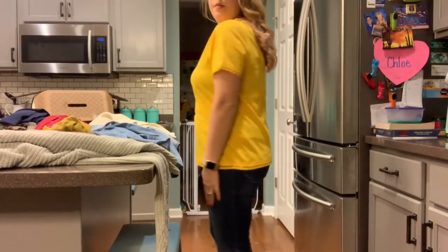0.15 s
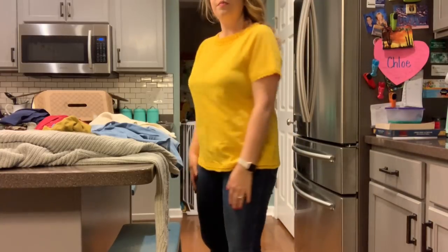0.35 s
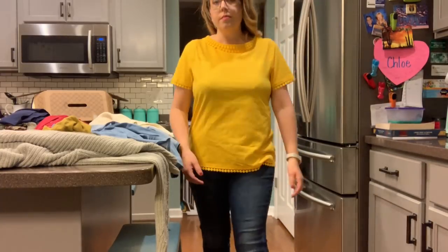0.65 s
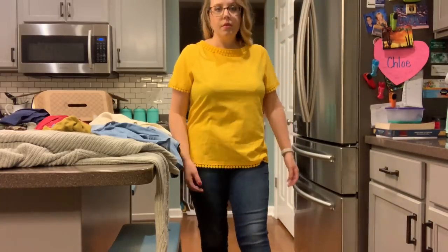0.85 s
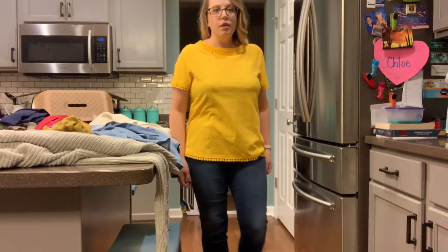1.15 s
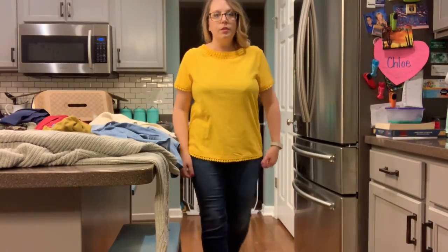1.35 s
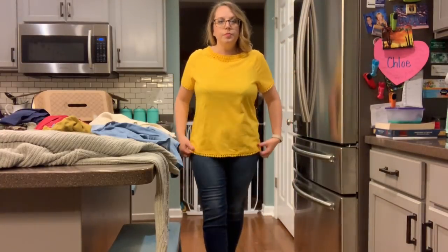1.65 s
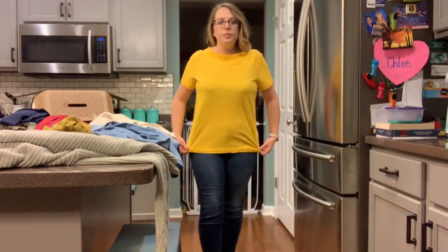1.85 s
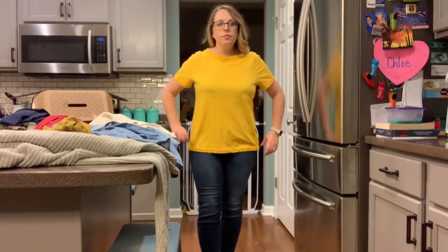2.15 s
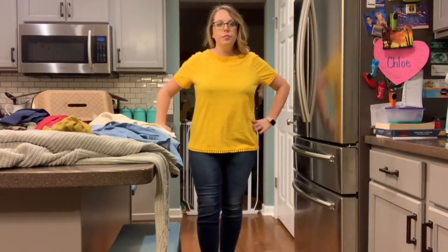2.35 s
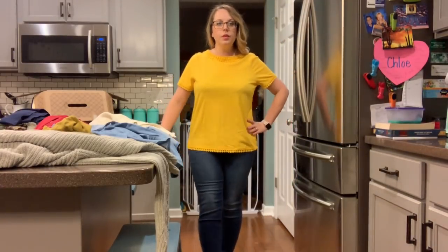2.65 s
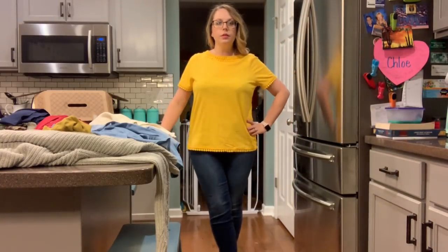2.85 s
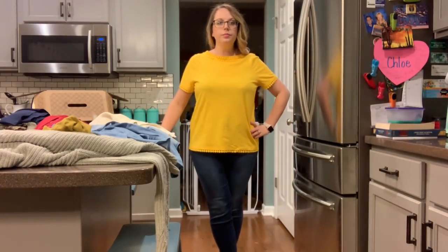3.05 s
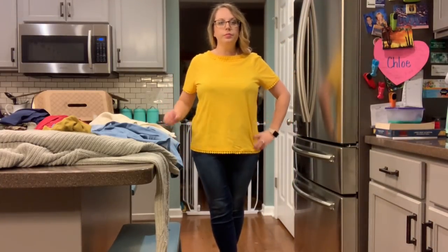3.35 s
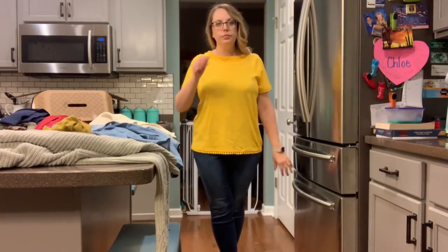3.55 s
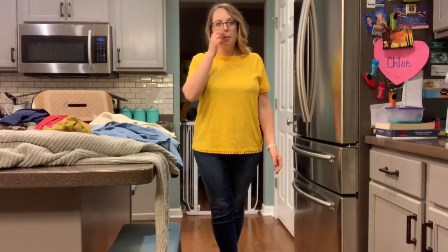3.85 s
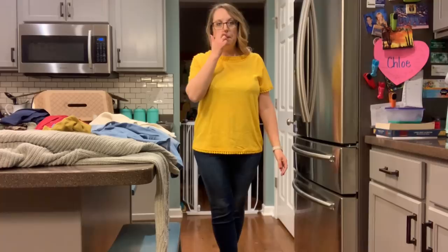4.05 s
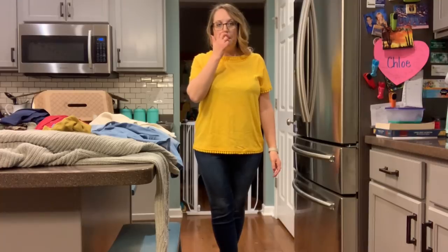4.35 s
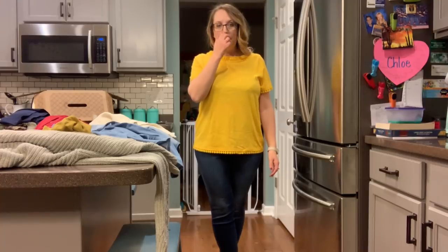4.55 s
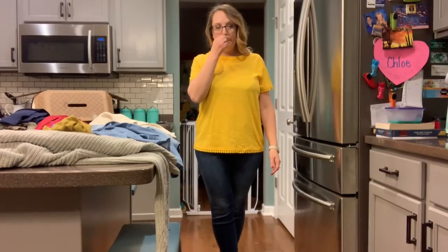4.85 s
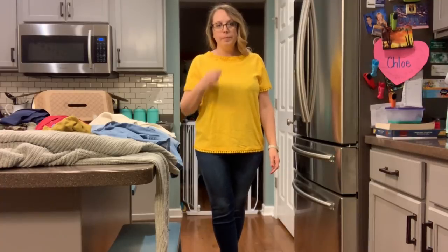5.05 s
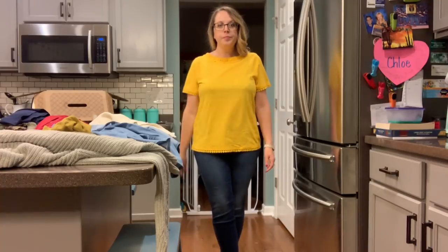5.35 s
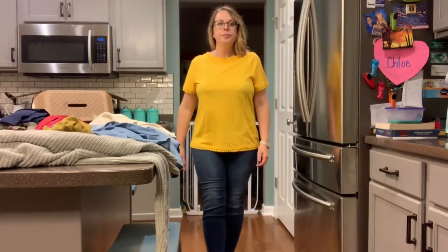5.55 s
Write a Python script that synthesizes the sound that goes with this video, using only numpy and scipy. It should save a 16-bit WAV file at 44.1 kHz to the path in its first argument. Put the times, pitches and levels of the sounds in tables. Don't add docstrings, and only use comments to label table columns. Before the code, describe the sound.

A quiet home kitchen is heard in stereo from a phone a few metres away, with faint refrigerator hum, low floor drone, thin appliance whine and slight hiss throughout. A soft step and faint crack come at 0.15-0.2 s, with light cloth rustle. Around 0.75-0.9 s another padded step knocks the boards, and a short rough creak squeaks at 0.94-1.05 s. A heavier cluster of thuds and knocks lands at 1.4-1.6 s, then the strongest low, woody crack at about 1.9 s. Small settling sounds follow, with duller thumps near 2.7 and 2.9 s and a fabric swish. A soft sleeve swish passes at 3.4 s, then the floor is almost still. A faint crack sounds at 4.2 s, tiny settling and a sleeve flick near 4.9 s, and faint knocks at 5.3 s. Clothing rustles more clearly at 5.4-5.7 s with a last gentle thump. Hard walls answer each blow briefly.

```python
import sys
import numpy as np
from scipy import signal
from scipy.fft import rfft, irfft, next_fast_len
from scipy.io import wavfile
from scipy.ndimage import uniform_filter1d, map_coordinates

SR = 44100
rng = np.random.default_rng(int(sys.argv[2]) if len(sys.argv) > 2 else 0)


def digitize_waveform(pressure):
    field = np.atleast_2d(pressure).T
    bounded = np.clip(field, -1, 1)
    quanta = np.round(bounded * 32767).astype(np.int16)
    wavfile.write(sys.argv[1], SR, quanta)


def undo_db(level):
    steps = np.asarray(level, float) / 20
    return 10 ** steps


N = 250750


def unit(x):
    return x / np.sqrt(np.mean(x ** 2) + 1e-20)


def along(points, hz):
    f, v = np.transpose(points)
    return np.interp(np.log(hz + 1), np.log(f + 1), v)


def curves(rows):
    s, *cols = np.transpose(rows)
    return [np.interp(np.arange(N) / SR, s, c) for c in cols]


def wobble(rate):
    knots = rng.standard_normal(int(N * rate / SR) + 4)
    return map_coordinates(knots, [np.arange(N) * rate / SR])


def filtered(x, response):
    n = x.shape[-1]
    m = next_fast_len(n + 8192)
    return irfft(rfft(x, m) * response(np.fft.rfftfreq(m, 1 / SR)), m)[..., :n]


def hump(hz, pitch_hz, rise_db, fall_db):
    octaves = np.log2((hz + 1) / pitch_hz)
    return undo_db(np.where(octaves < 0, rise_db, -fall_db) * octaves)


def spread(pair, spectrum):
    # f/Hz, left-right likeness
    alike = [(60, 0.97), (130, 1), (290, 0.93), (640, 0.71), (1410, 0.33), (3100, 0.17), (6800, 0.065),
             (15000, 0.13)]

    def mid_side(hz):
        turn = np.arccos(np.clip(along(alike, hz), -1, 1)) / 2
        return undo_db(along(spectrum, hz)) * [np.cos(turn), np.sin(turn)]

    mid, side = filtered(pair, mid_side)
    return np.array([mid + side, mid - side])


def rush(spectrum, patchy_db):
    z = signal.stft(rng.standard_normal((2, N)), nperseg=512)[2]
    field = uniform_filter1d(rng.standard_normal(z.shape[1:]), size=6, axis=0)
    field = uniform_filter1d(field, size=8, axis=1)
    pair = signal.istft(z * undo_db(patchy_db * unit(field)), nperseg=512)[1][:, :N]
    return unit(spread(pair, spectrum))


def strokes(rows):
    t = np.arange(N) / SR
    gains = []
    for s, db, swell, fade, *_ in rows:
        away = abs(t - s) / np.where(t < s, swell, fade)
        loss_db = 25 * away ** 1.37
        gains.append(undo_db(np.maximum(db - loss_db, -160)))
    return np.array(gains)


def joined(gains):
    return np.sqrt(np.sum(gains ** 2, axis=0))


def hiss():
    # f/Hz, density/dB per Hz
    noise_colour = [(300, -16), (700, -12.5), (1500, 1), (3000, -1), (8000, -4.5), (15700, -2)]
    return undo_db(-80.5) * rush(noise_colour, patchy_db=-2.7)


def whine():
    level = undo_db(-93 + 2.5 * wobble(23))
    tone = level * np.sin(2 * np.pi * 4360 * np.arange(N) / SR + 1.1 * wobble(60))
    return tone * np.array([[1.4], [-.6]])


def refrigerator():
    # f/Hz, level/dB rms
    tones = [(88, -73.5), (153, -70.5), (268, -80.5)]
    t = np.arange(N) / SR
    hum = np.zeros(N)
    for hz, db in tones:
        level = undo_db(db + 3.0 + 3.9 * wobble(6.9))
        hum += level * np.sin(2 * np.pi * hz * t + 1.88 * wobble(7.0))
    return hum


def joists():
    # peak t/s, drone level/dB, swell/s, fade/s, sway over drone/dB
    presses = [(0, -58, .1, 0.82, -3.5), (.7, -59.5, 1, 0.93, -4), (1.01, -59, 0.45, 0.14, 5),
               (1.17, -70, 0.16, 0.22, 14.5), (1.57, -46, 0.17, 0.16, 0.5), (1.9, -66, 0.67, 0.63, 10.5),
               (2.5, -60.5, 0.54, 0.79, 4.5), (2.96, -56, 0.08, 0.26, 5), (3.5, -66, 0.13, 0.35, -6.5),
               (3.7, -77, 0.4, 0.21, 8), (5.3, -69, 1, 0.95, -13.5), (5.6, -63.5, 0.56, 0.26, -3.5)]
    # f/Hz, density/dB per Hz
    sway_colour = [(10, -39.5), (20, 4.5), (35, -3), (60, -4.5), (90, -23.5), (200, -52.5)]
    # f/Hz, density/dB per Hz
    drone_colour = [(35, -35), (60, -20), (76, -4), (97, -3.5), (114, -11.5), (161, -2), (183, -10.5),
                    (268, -11.5), (348, -20.5), (683, -27), (773, -29), (1600, -39.5), (2080, -80),
                    (3520, -120)]
    rest_sway_db, rest_drone_db = -70.5, -67.5
    load = strokes(presses)
    sway_load = joined(load * undo_db(np.array(presses)[:, -1:]))
    sway = np.hypot(undo_db(rest_sway_db), sway_load) * rush(sway_colour, patchy_db=1)
    drone = np.hypot(undo_db(rest_drone_db), joined(load)) * undo_db(2.96) * rush(drone_colour, patchy_db=2.5)
    return sway + drone


def cloth():
    # peak t/s, rustle level/dB, swell/s, fade/s, heavy folds over rustle/dB
    fabric = [(0, -68.5, 0.043, 0.046, 5), (.11, -71.5, 0.12, 0.061, -25), (.28, -71.5, 0.35, 0.46, -8),
              (.57, -63.5, 0.21, 0.25, -15), (1.02, -72.5, 0.29, 0.12, 3), (1.29, -67, .04, 0.11, 2.5),
              (1.46, -63, 0.23, 0.2, 4), (1.549, -66.5, 0.29, 0.23, 2.5), (1.95, -73, 0.13, 0.18, 10.5),
              (2.37, -80.5, 0.029, 0.41, 6), (2.528, -64.5, 0.085, 0.21, 9), (2.75, -86.5, .2, 0.25, -11),
              (2.958, -61, 0.06, 0.12, 13.5), (3.14, -76.5, 0.22, 0.079, 3.5),
              (3.33, -79, 0.053, 0.17, -12), (3.441, -67, .2, 0.15, -4), (3.72, -82, 0.11, 0.14, -5.5),
              (4.88, -85, 0.12, 0.042, 11), (5.15, -90.5, 0.32, .2, 9.5), (5.359, -81, 0.1, 0.087, 10),
              (5.42, -60, 0.091, 0.083, 3.5), (5.648, -54.5, 0.1, 0.3, 3)]
    # peak t/s, level/dB, swell/s, fade/s
    sleeve = [
        (3.42, -63, 0.18, 0.13),
        (4.91, -67.5, 0.051, 0.033),
        (5.42, -79, .06, .07),
        (5.68, -62, .14, .1),
    ]
    # f/Hz, density/dB per Hz
    weave = [(300, -25), (1200, -11.5), (2200, -6.5), (3500, -2), (5000, -3.5), (7500, -7.5), (9500, -8),
             (12500, -10), (15700, -10)]
    fold = [(120, -73), (300, 1.5), (600, -9.5), (1200, -7), (2500, -9), (5000, -25.5)]
    sheen = [(3000, -33), (8000, -16), (11000, 0), (15000, 11), (15700, -2)]
    rubs = strokes(fabric)
    heavy = joined(rubs * undo_db(np.array(fabric)[:, -1:]))
    catches = undo_db(.8 * wobble(40) + 1.2 * wobble(300))
    fine = joined(rubs) * rush(weave, patchy_db=.7)
    folds = heavy * undo_db(-6.0) * rush(fold, patchy_db=1.0)
    swish = joined(strokes(sleeve)) * rush(sheen, patchy_db=5.5)
    return catches * (undo_db(5.5) * (fine + folds) + swish)


def ticks():
    # t/s, peak level/dB, f/Hz, t60/s
    taps = [
        (0.197, -60, 5460, 0.049),
        (.867, -54.5, 7600, 0.052),
        (1.274, -61, 9500, 0.14),
        (1.316, -56.5, 9500, 0.12),
        (2.346, -65.5, 9210, 0.038),
        (2.442, -67, 7400, 0.2),
        (2.814, -66, 11000, 0.044),
        (4.22, -63, 1210, 0.045),
        (5.149, -63.5, 887, 0.13),
    ]
    out, t = np.zeros((2, N + SR)), np.arange(SR // 8) / SR
    for s, db, pitch_hz, t60 in taps:
        band = lambda hz: np.exp(-((hz / pitch_hz - 1) / .07) ** 2)
        puff = unit(filtered(rng.standard_normal((2, len(t))), band))
        onset = 1 - np.exp(-t / 0.00067)
        out[:, round(s * SR):][:, :len(t)] += puff * undo_db(db - 60 * t / t60) * onset
    return out[:, :N]


def echo():
    # f/Hz, t60/s
    kitchen = [(80, 0.077), (210, 0.48), (560, 0.33), (1470, 0.44), (3880, 0.3), (10200, 0.073)]
    hz, t, z = signal.stft(rng.standard_normal((2, SR // 2)), SR, nperseg=256)
    build = 1 - np.exp(-t * (hz[:, None] + 60) / 2.0)
    room = undo_db(-60 * t / along(kitchen, hz)[:, None])
    cupboards = 3.4 * undo_db(-60 * t / 0.056)
    tail = signal.istft(z * build * (room + cupboards), SR, nperseg=256)[1][:, :SR // 2]
    fade_in = np.clip(np.arange(SR // 2) / (0.0081 * SR), 0, 1)
    tail = rfft(spread(tail, [(20, 0)]) * fade_in)
    power = uniform_filter1d(np.mean(abs(tail) ** 2, axis=0), size=60)
    return irfft(tail / np.sqrt(power), SR // 2)


def boards(hz):
    # f/Hz, width/Hz, boost/dB
    modes = [(118.4, 75, 4.5), (163, 86, 5), (273, 41, 2), (356.3, 46, 7.5), (424, 36, 7.5), (528, 97, 11),
             (655, 9.7, 8), (917, 95, 7.5), (1122, 120, 6.5), (1530, 150, 3.5), (3050, 680, 4.5)]
    gain = 1
    for c, w, db in modes:
        gain = gain * (1 + (undo_db(db) - 1) * 1j * hz * w / (c * c - hz * hz + 1j * hz * w))
    return gain


def blows(events, dry_db, wet_db, blur_s, bending):
    # f/Hz, gain/dB
    left_lift = [(200, 0), (1000, 2), (3000, 5), (7000, 1), (12000, 0)]
    out, lead = np.zeros((2, N + SR)), 1024
    t = np.arange(SR // 2 - lead) / SR
    for s, thud_db, knock_db, pitch_hz, dull_db in events:
        touch = rfft(np.pad(rng.standard_normal(len(t)) * np.exp(-t / blur_s), (lead, 0)))
        contact = irfft(touch / np.sqrt(uniform_filter1d(abs(touch) ** 2, size=150)), SR // 2)

        def floor(hz):
            thud = undo_db(thud_db) * hump(hz, 167, 4, 11.5)
            knock = undo_db(knock_db) * hump(hz, pitch_hz, 3.5, dull_db)
            air = hump(hz, 9000, 0, 8.5)
            bend = np.exp(-1j * bending * (np.sqrt(hz) - .0075 * hz))
            return np.hypot(thud, knock) * air * boards(hz) * bend

        wave = filtered(contact, floor)
        wave = wave + .4 * np.roll(wave, shift=rng.integers(25, 70))
        left = filtered(np.roll(wave, shift=2), lambda hz: undo_db(along(left_lift, hz)))
        sound = undo_db(dry_db) * np.array([left, wave])
        sound = sound + undo_db(wet_db) * signal.fftconvolve(wave[None], echo(), axes=1)[:, :SR // 2]
        out[:, round(s * SR):][:, :SR // 2] += sound
    return out[:, lead:lead + N]


def creak():
    # t/s, slip rate f/Hz, level/dB
    slide = [
        (.937, 640, -54),
        (.943, 639, -65),
        (.965, 655, -52),
        (.975, 516, -44.5),
        (1.0, 502.5, -53.5),
        (1.02, 514, -40.5),
        (1.036, 500.5, -56),
        (1.048, 507, -49),
    ]
    # f/Hz, level/dB
    squeal = [(500, 0), (1000, 3), (1600, 3.5), (2500, -5.5), (3800, -11), (5000, -21.5), (9000, -30)]
    rate_hz, db = curves(slide)
    t = np.arange(N) / SR
    on = (t > slide[0][0]) & (t < slide[-1][0])
    turns = np.cumsum(rate_hz * (1 + .05 * wobble(250))) / SR
    slips = np.diff(np.floor(turns), prepend=0) * undo_db(3.5 * wobble(250))
    grit = 0.11 * rng.standard_normal(N)
    colour = lambda hz: undo_db(along([(200, -36)] + squeal, hz))
    direct = on * undo_db(db) * unit(filtered(slips + grit, colour))
    room = signal.fftconvolve(direct[None], echo(), axes=1)[:, :N]
    return undo_db(2.5) * direct + undo_db(2.5) * room


def cracks():
    # t/s, thud level/dB, knock level/dB, knock f/Hz, dullness above it/dB per octave
    snaps = [
        (.199, -42, -43, 503, 4),
        (.866, -39.5, -31, 304, 10),
        (1, -60, -24, 952, 8.5),
        (1.389, -15.5, -21, 3000, 12),
        (1.476, -37, -20.5, 560, 6),
        (1.909, -18.5, -11.5, 307, 7),
        (2.493, -49, -35.5, 910, 2),
        (2.665, -24.5, -36, 1170, 8.5),
        (2.915, -15.5, -24.5, 890, 4),
        (4.244, -48, -40, 2090, 18.5),
    ]
    return blows(snaps, dry_db=17.5, wet_db=19, blur_s=.00002, bending=1.4)


def treads():
    # t/s, thud
    # level/dB, knock level/dB, knock f/Hz, dullness above it/dB per octave
    soft_blows = [(.149, -32, -31, 393, 15), (.763, -15, -38, 1740, 42.5), (.883, -20, -26, 302, 12),
                  (.942, -18, -28, 2470, 21.5), (1.279, -48.5, -50.5, 300, 1.5), (1.41, -18, -20, 807, 9),
                  (1.488, -28, -34.5, 500, 17), (1.524, -10, -36.5, 970, 14), (1.529, -10, -19, 980, 10.5),
                  (1.544, -20, -41, 2910, -0.5), (1.603, -21.5, -56, 710, 5.5),
                  (1.877, -21.5, -26, 1080, 11), (1.933, -30.5, -8.5, 213, 9),
                  (2.127, -34, -46.5, 300, 3), (2.347, -31.5, -52.5, 880, 4), (2.437, -54, -60, 8100, -12),
              (2.481, -50, -47.5, 1290, 1), (2.678, -17, -31.5, 584, 7), (2.753, -31, -44.5, 500, 4.5),
              (2.814, -61, -58.5, 2560, 17), (2.933, -17.5, -21, 426, 6.5),
              (4.838, -45.5, -47.5, 2230, 10.5), (4.867, -56.5, -56, 2470, 18.5), (5.291, -58, -67, 900, 5),
              (5.338, -38, -40, 2330, 10.5), (5.622, -45, -39, 725, 14), (5.66, -37, -27.5, 300, 10)]
    return blows(soft_blows, dry_db=13.5, wet_db=19, blur_s=.004, bending=.5)


def scene():
    house = joists() + refrigerator() + hiss() + whine()
    floor = undo_db([[.3], [-.3]]) * (cracks() + treads() + creak())
    return floor + cloth() + ticks() + house


def band_limit(x):
    return signal.sosfilt(signal.butter(12, 17010, fs=SR, output="sos"), x)


def record(dry):
    # f/Hz, share of the left port's treble that repeats the right port's
    shared = [(5500, 0), (7000, .4), (8600, .6), (10000, .82), (11000, .93), (16000, .93)]
    lag_s, turn_rad, limit_hz = .0004927, 2.77, 15760
    late = lambda hz: along(shared, hz) * np.exp(1j * (turn_rad - 2 * np.pi * hz * lag_s))
    own = lambda hz: np.sqrt(1 - along(shared, hz) ** 2)
    left = filtered(dry[1], late) + filtered(dry[0], own)
    band = lambda hz: hump(hz, 9500, 0, 5.5) * undo_db(-29 * (hz > limit_hz))
    return band_limit(filtered(np.array([left, dry[1]]), band))


dry = scene()
out = record(dry)
digitize_waveform(out)
```